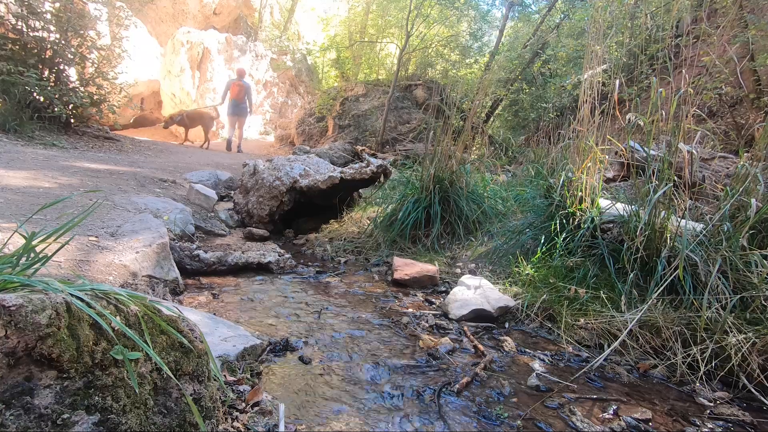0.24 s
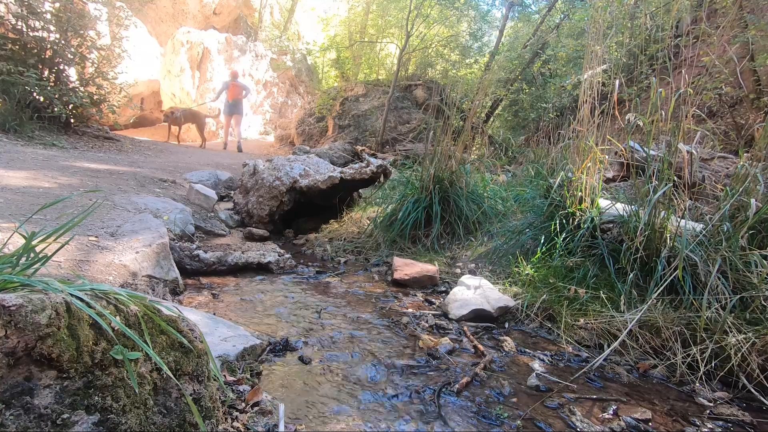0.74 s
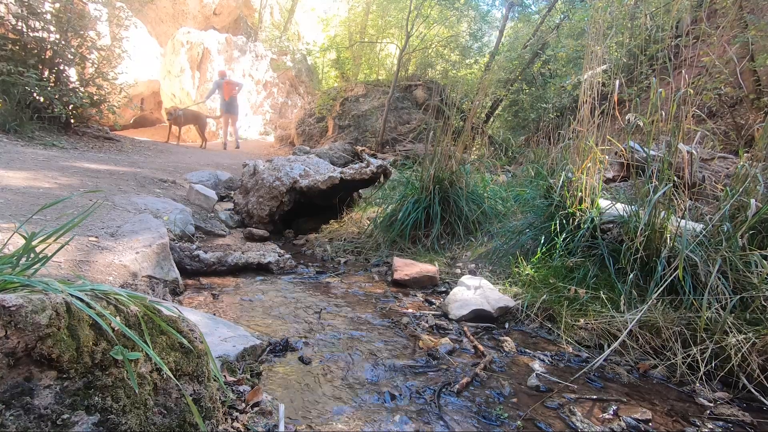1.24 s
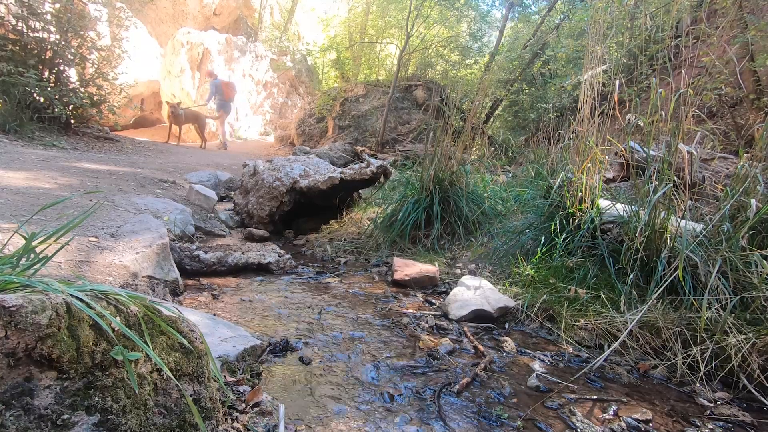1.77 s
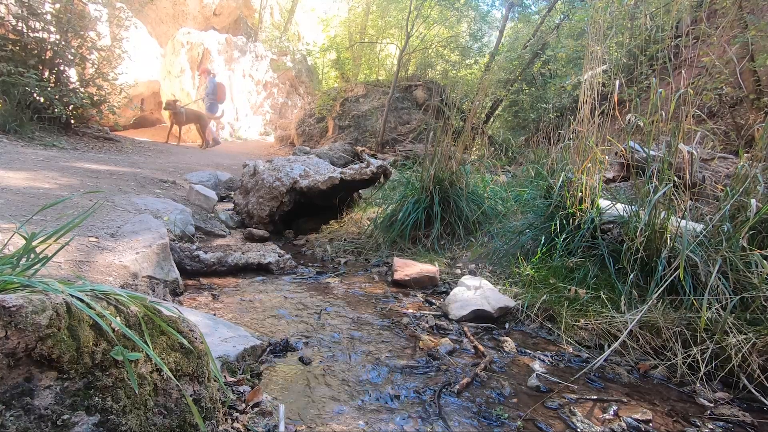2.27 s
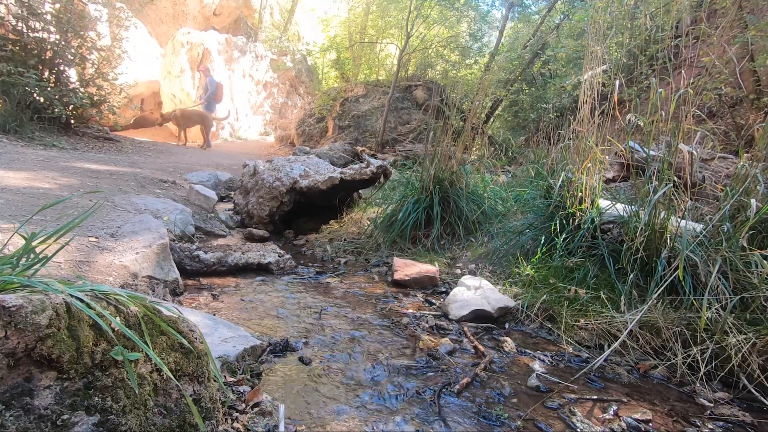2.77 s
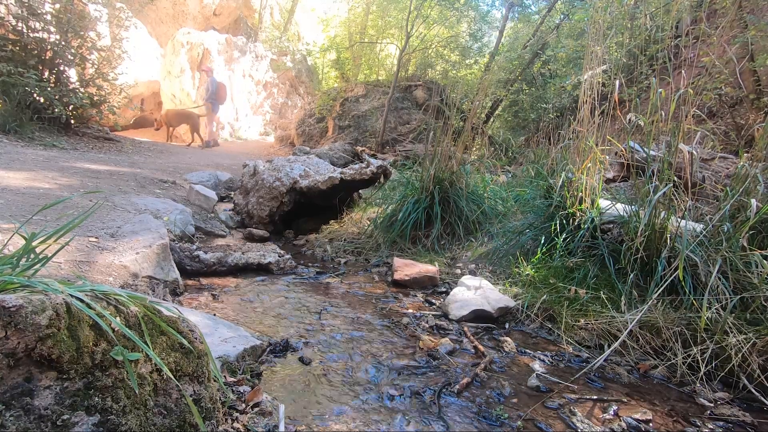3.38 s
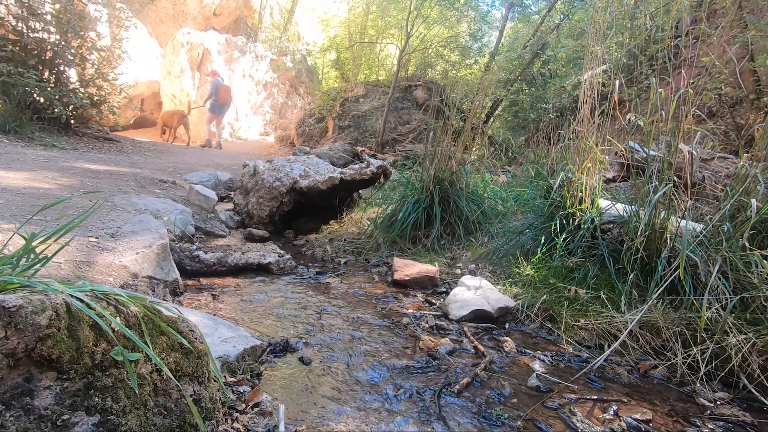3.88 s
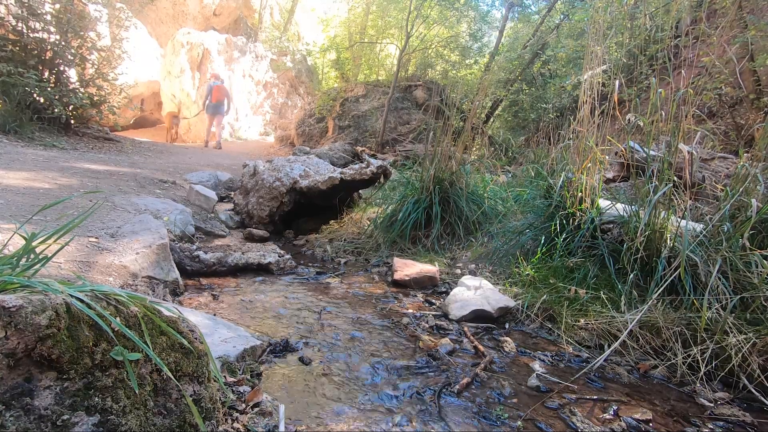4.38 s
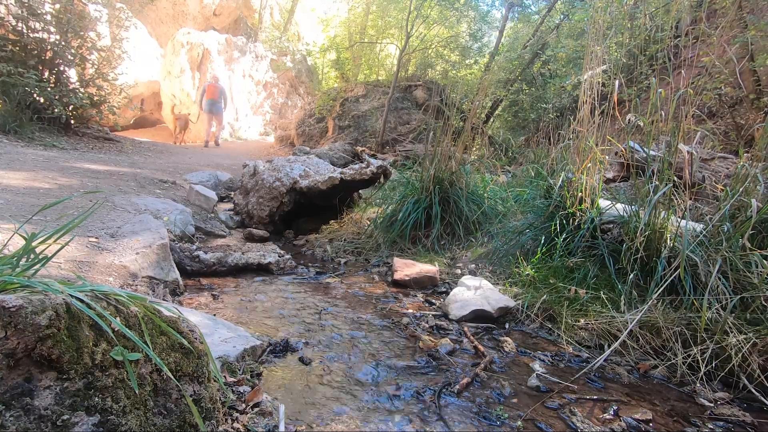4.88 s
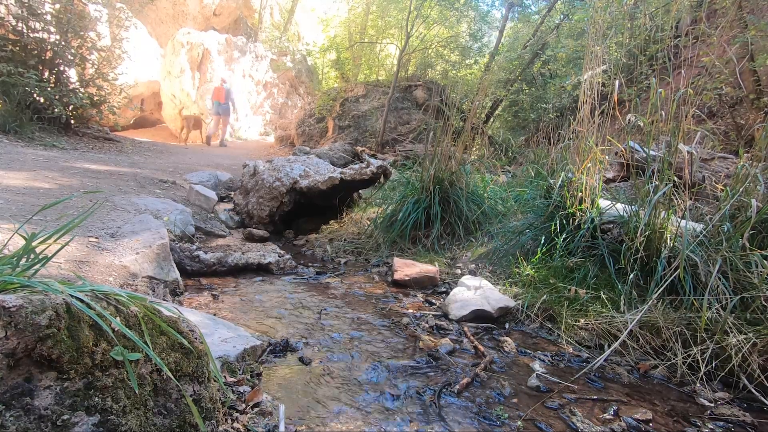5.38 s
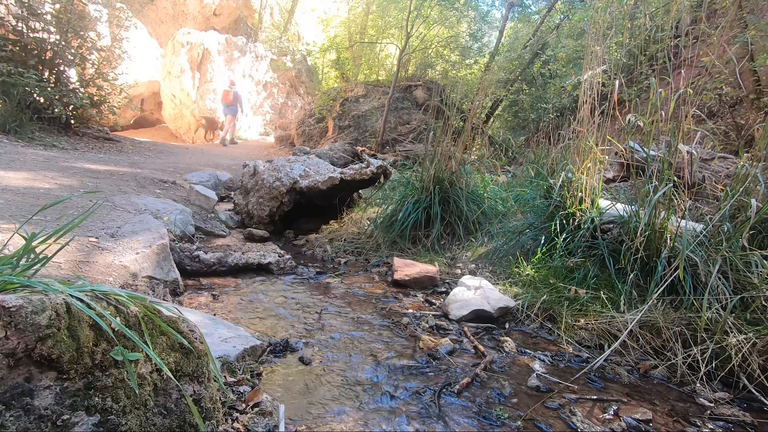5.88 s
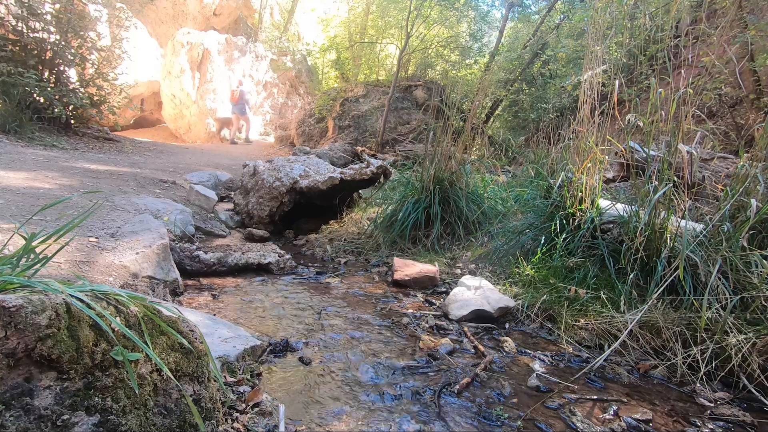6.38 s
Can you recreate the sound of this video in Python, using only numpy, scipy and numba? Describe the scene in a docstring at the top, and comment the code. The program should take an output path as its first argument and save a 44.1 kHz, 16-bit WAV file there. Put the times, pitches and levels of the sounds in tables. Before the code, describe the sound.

A shallow creek trickles quietly and steadily over stones, close on the left, with a smaller tinkling stream beside it and a faint hiss of water farther off. It opens with a brief dull rush and a click. Small bubbles plop and tick throughout, among light splashes. A gentle breeze rumbles on the microphone, and a few soft knocks bump it, mostly in the first half.

```python
"""Shallow creek over stones

A riffle trickles close on the left, a smaller rill tinkles left of centre, over a distant hiss.
Wavelets shed clusters of ringing bubbles, coloured by hollows between stones; some plop or tick.
A light breeze sways on the microphone, among soft knocks and splashy scuffs.
The sound opens with a brief dull rush; just after, a low sway cuts off abruptly with a click."""
import sys
import numpy as np
from scipy import signal
from scipy.fft import rfft, irfft
from scipy.io import wavfile
from scipy.ndimage import uniform_filter1d
from numba import njit

SR = 44100
rng = np.random.default_rng(int(sys.argv[2]) if len(sys.argv) > 2 else 0)


def digitize_waveform(pressure):
    """Quantize a signal to 16-bit integers and store it at the path in sys.argv[1].

    Rows of a 2-D input are taken as channels; values are limited to [-1, 1].
    """
    field = np.atleast_2d(pressure).T
    bounded = np.clip(field, -1, 1)
    quanta = np.round(bounded * 32767).astype(np.int16)
    wavfile.write(sys.argv[1], SR, quanta)


N = 292824
T = np.arange(N) / SR
TOP_HZ = 15800

# Distant water spectrum. Each row: frequency in Hz, relative gain in dB.
WASH_EQ = [(30, -4.5), (60, 3.5), (110, 2), (200, -3), (400, -5), (1000, -6), (2200, -6.5), (4500, -12.5),
           (7000, -16), (11000, -18), (15500, -20.5)]
# Gusts on the microphone. Each row: peak time in seconds, strength in dB, release in seconds.
AIR_GUSTS = [(0.027, -9.5, 0.027), (.13, -35, 0.11), (.3, -29.5, 0.47), (.79, -21, 0.038),
             (1.12, -33.5, 0.14), (1.6, -34, 0.3), (2.39, -24.5, 0.4), (2.82, -25, 0.32),
             (4.45, -30.5, 0.092), (4.95, -34, 0.13), (6.55, -31.5, 0.12)]
# Microphone housing modes. Each row: frequency in Hz, gain in dB, T60 in seconds.
HOUSING_MODES = [(109.5, -1.5, 0.18), (160, -1, 0.11), (175, -12, 0.071), (260, -27, 0.021)]
# Blows on the housing. Each row: start in seconds, strength in dB.
HOUSING_KNOCKS = [(0.137, -42), (0.163, -36), (.181, -51), (0.612, -47), (0.748, -34.5), (0.765, -35.5),
                  (2.293, -49), (2.738, -41.5), (5.192, -51)]
# Opening dull rush (first two rows), then splashy scuffs.
# Each row: centre in seconds, half length in seconds, level in dB, pitch in Hz.
RUSH_AND_SCUFFS = [(.004, 0.014, -54.5, 800), (.008, 0.015, -54, 2170), (0.206, 0.028, -60, 2160),
                   (0.211, 0.0049, -64, 3600), (0.283, 0.0088, -60.5, 3220), (0.347, 0.011, -59, 900),
                   (0.51, 0.017, -68, 6000), (0.623, 0.019, -54, 2600), (0.633, 0.014, -50, 450),
                   (0.647, 0.0098, -51.5, 2150), (0.63, 0.016, -70, 4570), (0.713, 0.014, -64, 3500),
                   (0.802, 0.0063, -52.5, 2100), (0.812, 0.022, -58, 410), (0.815, 0.0096, -63, 5600),
                   (0.886, 0.023, -61, 4700), (0.887, 0.019, -70, 9800), (0.891, 0.012, -54, 2080),
                   (.895, 0.0083, -56, 426), (1.037, .018, -65.5, 4340), (1.159, 0.0084, -59.5, 3580),
                   (1.352, 0.036, -57.5, 744), (1.549, 0.0092, -59, 445), (1.58, 0.045, -62.5, 2130),
                   (1.601, 0.035, -69.5, 8950), (1.793, 0.026, -65, 3660), (2.214, .01, -63.5, 3930),
                   (2.467, 0.016, -55, 2320), (2.477, 0.024, -53, 696), (2.612, 0.005, -59, 3770),
                   (2.801, 0.028, -67.5, 3740), (2.995, .02, -63.5, 3780), (3.034, 0.023, -64.5, 2060),
                   (3.41, 0.019, -66, 4300), (3.519, .014, -62, 2270), (3.78, 0.02, -66, 4760),
                   (4.018, 0.0057, -54.5, 1050), (4.432, .012, -63.5, 3800), (4.491, 0.012, -63, 3630),
                   (4.748, 0.013, -62, 3350), (5.289, 0.031, -63.5, 2500), (5.524, 0.024, -64.5, 4200),
                   (5.742, 0.019, -60.5, 850), (5.971, .007, -69, 6800), (6.036, 0.0055, -60, 4280),
                   (6.253, 0.016, -63, 3900), (6.352, 0.017, -62, 4100), (6.485, 0.019, -58, 1020),
                   (6.532, 0.0086, -59.5, 3530)]
# Spray landing on stone. Each row: time in seconds, level in dB, pitch in Hz.
SPRAY_FLECKS = [(.395, -63, 6100), (.8005, -62, 9600), (.891, -66, 10400), (1.03, -69, 11200),
                (1.515, -68, 6300), (1.61, -70, 9700), (1.751, -69, 9600), (1.853, -64, 9400),
                (2.171, -65.5, 10800), (2.28, -66, 6700), (2.526, -72, 10600), (2.953, -66.5, 11500),
                (3.332, -65, 11200), (3.746, -66, 10200), (3.906, -69, 10700), (5.503, -69, 11400),
                (5.909, -64, 6200), (6.03, -67, 9200), (6.223, -65, 10600), (6.352, -68.5, 9500),
                (6.477, -64, 6400)]
# Rill spectrum. Each row: frequency in Hz, relative gain in dB.
RILL_EQ = [(400, 8), (800, -0.5), (1500, 9.5), (2800, -10), (4500, -12), (7000, -21), (15500, -28)]
# Close bubbles. Each row: start in seconds, peak in dB, pitch in Hz, life in cycles,
# left minus right in dB.
PLOP_BUBBLES = [(.2099, -29, 2110, 13, 22), (.221, -37, 2100, 12, 19), (.793, -48, 560, 28, 20),
                (.8, -32, 4500, 15, 22), (1.0845, -46, 575, 12, 24), (1.1, -43, 1910, 22, 40),
                (1.153, -45, 2060, 9, 20), (1.228, -56, 5400, 71, 13), (1.235, -55, 6170, 83, 17),
                (1.451, -55, 810, 87, -2), (1.553, -46.5, 2340, 75, 18), (1.6512, -41, 1910, 12, 13),
                (1.662, -49, 1610, 34, 24), (1.7, -42.5, 550, 17, 28), (1.782, -47, 3450, 66, 23),
                (1.8175, -50, 1500, 22, 24), (2.005, -46, 573, 13, 28), (2.032, -41, 3400, 11, 23),
                (2.093, -44, 4280, 36, 22), (2.1285, -46, 1560, 26, 9), (2.4475, -32.5, 2400, 7.8, 27),
                (2.4545, -43, 2080, 8, 10), (2.532, -50, 1290, 44, -4), (2.677, -47, 550, 18, 17),
                (2.728, -52, 1000, 41, 11), (2.8177, -44.5, 561, 38, 29), (2.845, -52, 705, 26, 1),
                (2.98, -56, 1560, 78, 21), (3.1297, -45, 2100, 13, 26), (3.187, -48, 1830, 44, 14),
                (3.2795, -45, 1860, 17, 20), (3.291, -51, 1593, 89, 30.5), (3.508, -48.5, 1930, 23, 25),
                (3.5535, -51.5, 566, 46, 35), (3.6465, -51.5, 580, 37, 26), (3.696, -47, 1880, 28, 19),
                (3.7895, -55, 1960, 92, 19), (4.007, -45, 590, 20, 22), (4.019, -39, 1800, 7, 20),
                (4.1443, -46, 627, 26, 27), (4.239, -40, 1380, 18, 24), (4.287, -52, 644, 21, 20),
                (4.3573, -52, 1940, 69, 13), (4.587, -35.5, 1870, 6.5, 30), (4.595, -46.5, 540, 29, 21),
                (4.651, -42.5, 990, 12, 16), (4.7127, -43, 1840, 22, 17), (4.769, -46, 1910, 25, 19),
                (4.834, -48, 2000, 29, 17), (4.875, -57, 610, 36, 20), (4.991, -40, 1990, 9.3, 21),
                (5.1725, -48.5, 1580, 20, 26), (5.228, -45, 2000, 23, 19), (5.296, -50, 2380, 40, 18),
                (5.407, -47, 1870, 24, 19), (5.493, -48.5, 1940, 32, 16), (5.5545, -52.5, 547, 64, 21),
                (5.6643, -48, 1960, 26, 26), (5.78, -49, 4180, 38, 20), (5.862, -53.5, 610, 24, 25),
                (5.9713, -46.5, 2710, 55, 9), (6.0314, -39.5, 4120, 10, -27), (6.081, -57, 960, 110, 20),
                (6.352, -42.5, 4030, 16, 22), (6.404, -46.5, 4600, 26, 18), (6.508, -48, 1500, 85, 22),
                (6.523, -46, 620, 16, 24), (6.524, -47, 3100, 14, 23), (6.599, -49, 597, 24, 29)]
# Swells of spray. Each row: centre in seconds, half length in seconds, rise in dB.
SPRAY_GUSHES = [(1.552, 0.15, 5), (1.823, 0.097, 9.5), (5.946, 0.063, 7.5)]
# Hollows between stones. Each row: resonance in Hz, width in Hz, relative gain in dB.
STONE_HOLLOWS = [(565, 27, 7), (632.5, 28, 4.5), (979.5, 11.3, 7.5), (1197, 130, 3), (1606, 17, 11),
                 (1860, 105, 2), (2512, 9.5, 9), (3400, 39, 3.5), (3580, 130, -2)]
# Near water spectrum. Each row: frequency in Hz, relative gain in dB.
RIFFLE_EQ = [(120, -3.5), (280, 0.5), (480, 1), (800, 0.5), (1400, -3.5), (2100, 0.14), (2700, -3),
             (3000, -7.5), (4500, -5), (6500, -18), (10000, -33), (15500, -24.5)]


def undb(db):
    """Decibels to gain."""
    return 10 ** (np.asarray(db) / 20)


def level(x, db):
    """Scale to an rms level."""
    return x * undb(db) / np.sqrt(np.mean(x ** 2))


def decay(age_s, t60_s):
    """Exponential fall, 60 dB per t60_s."""
    return np.exp(-np.log(1000) * age_s / t60_s)


def walk(rate_hz):
    """Random steps, smoothed twice; spread near 1."""
    hold = int(SR / rate_hz)
    steps = np.repeat(rng.standard_normal(N // hold + 1), hold)
    return np.sqrt(2) * uniform_filter1d(uniform_filter1d(steps, hold), hold)[:N]


def colour(x, points):
    """Minimum-phase filter through (Hz, dB) points; attacks stay sharp."""
    hz, db = np.transpose(points)
    size = 4096
    bins_hz = np.fft.rfftfreq(size, 1 / SR) + 1
    cepstrum = irfft(np.log(undb(np.interp(np.log(bins_hz), np.log(hz), db))))
    cepstrum[1:size // 2] *= 2
    cepstrum[size // 2 + 1:] = 0
    return signal.fftconvolve(x, irfft(np.exp(rfft(cepstrum))))[:N]


def resonate(x, hz, width_hz):
    """One resonance, unity gain at centre."""
    return signal.lfilter(*signal.iirpeak(hz, hz / width_hz, SR), x)


def place(x, pan_db):
    """Mono to stereo, far side attenuated; positive is left."""
    return x * undb([[min(pan_db, 0)], [min(-pan_db, 0)]])


@njit
def ring(start_s, hz, cycles, amplitude, glide):
    """Bubbles: sines dying 50 dB over `cycles`; pitch climbs by the fraction `glide` as they surface."""
    out = np.zeros(N)
    for k in range(len(start_s)):
        first, length = int(start_s[k] * SR), int(cycles[k] * SR / hz[k]) + 2
        phasor = amplitude[k] + 0j
        pole = np.exp(2j * np.pi * hz[k] / SR - 5.76 / length)
        rise = np.exp(2j * np.pi * hz[k] / SR * glide / length)
        for i in range(max(first, 0), min(first + length, N)):
            phasor *= pole
            pole *= rise
            out[i] += phasor.imag
    return out


def babble(per_s, low_hz, high_hz, cycles, spread_db, lag_s, glide, count):
    """Wavelets at random times, each shedding `count` bubbles of related size."""
    wavelets = rng.random((int(per_s * N / SR), 3 + 4 * count))
    when, pitch, force = wavelets[:, :3].T[:, :, None]
    late, detune, damping, strength = wavelets[:, 3:].reshape(-1, 4, count).transpose(1, 0, 2)
    start_s = when * N / SR - lag_s * np.log(late)
    centre_hz = (np.sqrt(low_hz) + pitch * (np.sqrt(high_hz) - np.sqrt(low_hz))) ** 2
    hz = np.minimum(centre_hz * 2 ** (detune - .5), TOP_HZ)
    life_cycles = cycles * 3 ** (damping - .5)
    amplitude = undb(-spread_db * np.log(.05 + force) - 2.2 * np.log(.015 + strength))  # mostly faint
    amplitude *= hz ** .75  # evens the spectrum
    return ring(start_s.ravel(), hz.ravel(), life_cycles.ravel(), amplitude.ravel(), glide)


def burst(centre_s, half_s, db, hz, cycles, octaves, count, spread_db=2.3):
    """Ringing grains around one pitch; they crowd in fast and thin out more slowly."""
    when, pitch, force = np.clip(rng.standard_normal((count, 3)).T, -2, 2)
    start_s = np.abs(centre_s + 2 * half_s * np.expm1(when / 3))
    grain_hz = np.minimum(hz * 2 ** (octaves * pitch), TOP_HZ)
    grains = ring(start_s, grain_hz, np.full(count, float(cycles)), undb(spread_db * force), 0.)
    return grains * undb(db) / np.sqrt(np.sum(grains ** 2) / (2 * half_s * SR))


def wash():
    """The rest of the creek, blurred by distance into even hiss."""
    common, left, right = (level(colour(rng.standard_normal(N), WASH_EQ), 0) for _ in range(3))
    sides = np.array([undb(-64.5) * left, undb(-66) * right])
    return sides * undb(.19 * walk(9)) + undb(-81.5) * common


def gusts(calm_db=-37.5, attack_s=.14):
    """Air strength: each gust builds, then dies into the calm."""
    swells = [undb(db) * np.exp(-np.maximum((peak_s - T) / attack_s, (T - peak_s) / release_s))
              for peak_s, db, release_s in AIR_GUSTS]
    return np.sqrt(undb(calm_db) ** 2 + np.sum(np.square(swells), axis=0))


def breeze(sway_hz=6.4, width_hz=9):
    """Air on the microphone ports: slow eddies, rumble and a drone of the housing's lowest mode."""
    strength = gusts()
    eddies = np.array([resonate(rng.standard_normal(N + SR), sway_hz, width_hz) for _ in range(2)])
    eddies = np.tanh(level(eddies[:, SR:], 8)) * strength
    fade_in = np.minimum(T / .02, 1)
    eddies = signal.sosfiltfilt(signal.butter(4, 15, fs=SR, output="sos"), eddies * fade_in)
    rumble = signal.sosfilt(signal.butter(4, 36, fs=SR, output="sos"), rng.standard_normal(N))
    drone_hz = HOUSING_MODES[0][0]
    drone = resonate(resonate(rng.standard_normal(N), drone_hz, 25), drone_hz, 25)
    buffet = (level(rumble, -26.5) + level(drone, -41)) * strength
    pressure = place(eddies[0] + buffet, 13) * [[1], [-1]]  # suction on the other port
    return pressure + place(eddies[1], -8.5) * undb(-13.5)


def click(at_s=.1322, peak_db=-25, rise_s=.012):
    """A low sway cuts off abruptly with a click; channels in antiphase."""
    sway = undb(peak_db) * (T < at_s) * np.exp(-np.abs(T - at_s) / rise_s)
    return place(sway, 13) * [[1], [-1]]


def knocks(contact_s=.0078, rub_t60_s=.13):
    """Soft blows ring the housing's low modes, each with a dull rub."""
    blows, age_s = np.zeros(N), T[:SR // 2]
    for start_s, db in HOUSING_KNOCKS:
        blows[int(start_s * SR)] += undb(db)
    onset = 1 - np.exp(-age_s / contact_s)
    modes = sum(undb(db) * decay(age_s, t60_s) * np.sin(2 * np.pi * hz * age_s)
                for hz, db, t60_s in HOUSING_MODES)
    thuds = signal.fftconvolve(blows, modes * onset)[:N]
    grip = signal.fftconvolve(blows, onset * decay(age_s, rub_t60_s))[:N]
    friction = colour(rng.standard_normal(N), [(40, 3), (170, -12), (350, -27), (1500, -46)])
    rub = grip * level(friction, -7)
    return place(thuds + rub, 12.7) * [[1], [-1]]  # housing rocks: ports in antiphase


def rush_and_scuffs():
    """A brief dull opening rush, then splashy scuffs: dense, broad bursts of grains."""
    return place(sum(burst(*row, cycles=10, octaves=.33, count=90) for row in RUSH_AND_SCUFFS), 16)


def flecks(half_s=.0013):
    """Handfuls of tiny droplets land on stone almost at once."""
    drops = sum(burst(time_s, half_s, db, hz, cycles=20, octaves=.13, count=7)
                for time_s, db, hz in SPRAY_FLECKS)
    return place(drops, 9)


def splashes():
    """Wavelets slap stones and throw a few bright droplets."""
    drops = babble(9, 3500, 8000, cycles=24, spread_db=1.2, lag_s=.012, glide=.05, count=9)
    drops = colour(drops, [(3000, 9), (5500, 5), (8000, -16), (15000, -26)])
    return place(level(drops, -81.5), 16)


def rill():
    """Small side stream: sparse, clear bubbles and tiny pinging droplets, left of centre."""
    bubbles = babble(50, 703, 4990, cycles=44, spread_db=2.6, lag_s=.008, glide=.073, count=2)
    pings = babble(45, 4910, 13400, cycles=28, spread_db=2.8, lag_s=.0045, glide=.071, count=2)
    bubbles = level(colour(bubbles, RILL_EQ), -78.5)
    pings = level(colour(pings, RILL_EQ), -75.5)
    return place(bubbles, 9.5) + place(pings, 13)


def plops(glide=.17):
    """Single close bubbles; the shortest sound as ticks."""
    one = np.ones(1)
    return sum(place(ring(start_s * one, hz * one, cycles * one, undb(db) * one, glide), pan_db)
               for start_s, db, hz, cycles, pan_db in PLOP_BUBBLES)


def gushes_db():
    """Smooth swells in the spray."""
    return sum(db * np.exp(-((T - centre_s) / half_s) ** 2) for centre_s, half_s, db in SPRAY_GUSHES)


def hollow(x, hz, width_hz, drift=.0094):
    """Cavity resonance; pitch wavers as its water rises and falls."""
    carrier = np.exp(2j * np.pi * np.cumsum(hz * (1 + drift * walk(6))) / SR)
    pole = np.exp(-np.pi * width_hz / SR)
    return 2 * (carrier * signal.lfilter([1 - pole], [1, -pole], x * carrier.conj())).real


def riffle():
    """Near water: surging gurgle, clear plips and fine spray ring in the hollows between stones."""
    gurgle = babble(420, 180, 3000, cycles=14, spread_db=1.5, lag_s=.006, glide=.1, count=5)
    plips = babble(80, 480, 2700, cycles=28, spread_db=.8, lag_s=.008, glide=.08, count=1)
    spray = babble(520, 2880, 14850, cycles=19, spread_db=2.5, lag_s=.005, glide=.085, count=4)
    spray = level(spray, 4) * undb(1.4 * walk(14) + gushes_db())
    gurgle = level(gurgle, -.5) * undb(2.8 * walk(24))
    water = colour(gurgle + level(plips, -6) + spray, RIFFLE_EQ)
    ringing = sum(undb(db - 3.5) * hollow(water, hz, width_hz) for hz, width_hz, db in STONE_HOLLOWS)
    return place(level(water + ringing, -60), 36)


def banks(x, tail_db=-10.5, t60_s=.13, delay_s=.0023):
    """Scatter from rocky banks adds a short diffuse tail."""
    age_s = T[:SR // 4]
    tails = rng.standard_normal((2, len(age_s))) * (age_s > delay_s) * decay(age_s, t60_s)
    tails *= undb(tail_db) / np.linalg.norm(tails, axis=1, keepdims=True)
    return x + signal.fftconvolve(x, tails, axes=1)[:, :N]


def scene():
    """Water between its banks, knocks and air on the microphone, one click."""
    water = banks(riffle() + rill() + splashes() + plops())
    return water + flecks() + wash() + rush_and_scuffs() + knocks() + breeze() + click()


def record(dry):
    """Steep low-pass at TOP_HZ."""
    return signal.sosfilt(signal.ellip(10, .1, 70, TOP_HZ, fs=SR, output="sos"), dry)


dry = scene()
out = record(dry)
digitize_waveform(out)
```